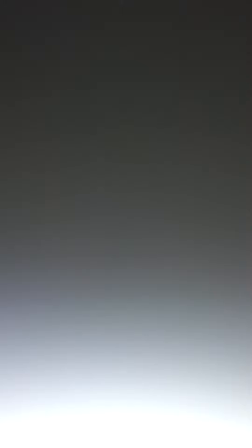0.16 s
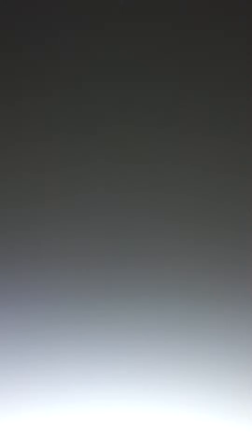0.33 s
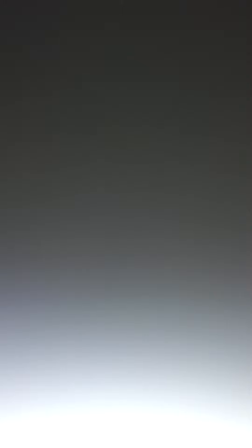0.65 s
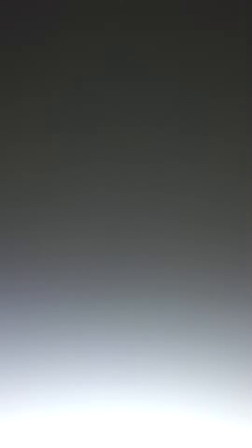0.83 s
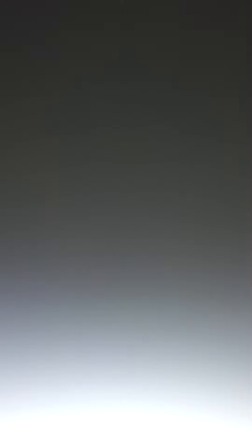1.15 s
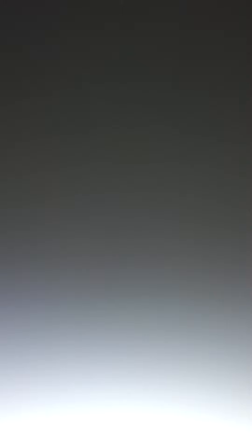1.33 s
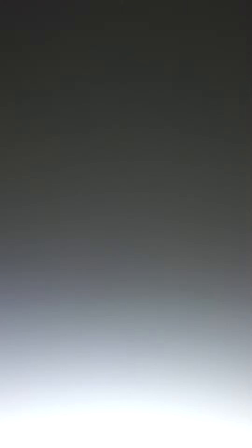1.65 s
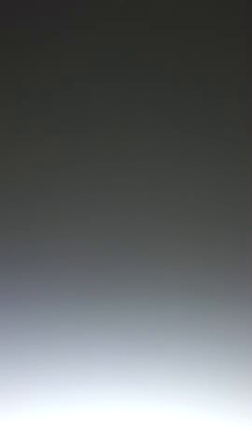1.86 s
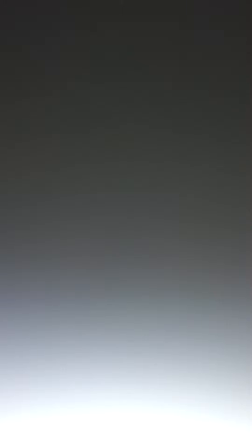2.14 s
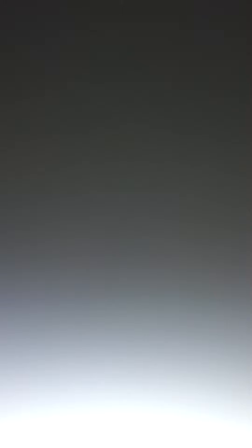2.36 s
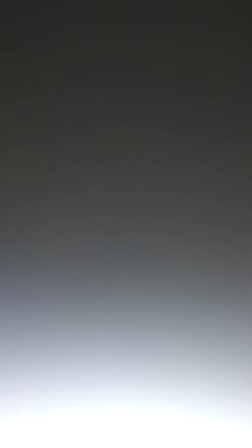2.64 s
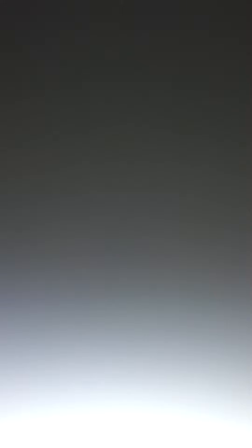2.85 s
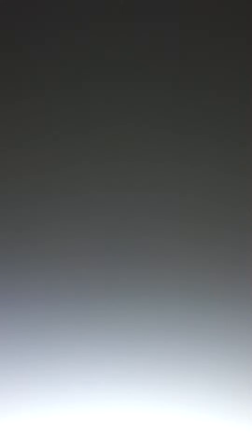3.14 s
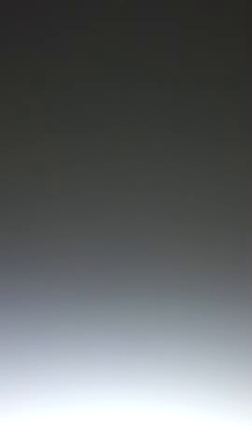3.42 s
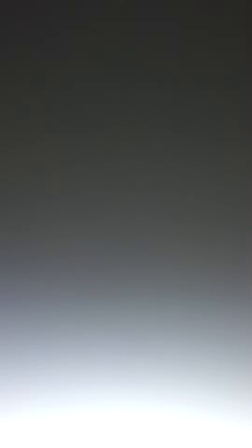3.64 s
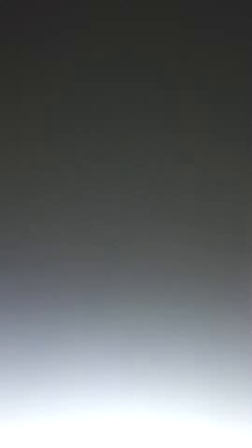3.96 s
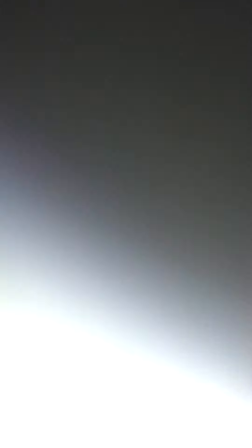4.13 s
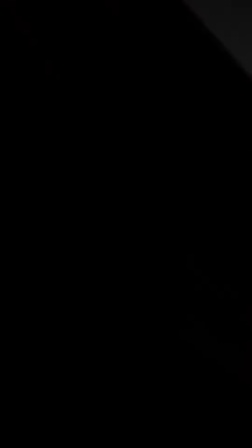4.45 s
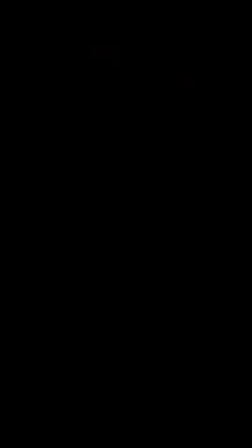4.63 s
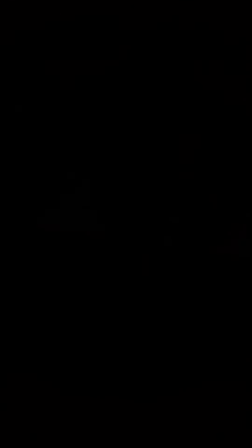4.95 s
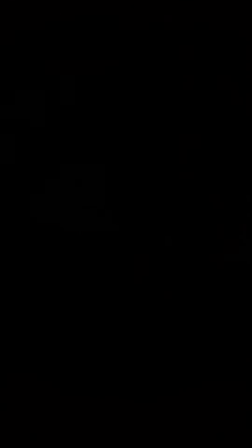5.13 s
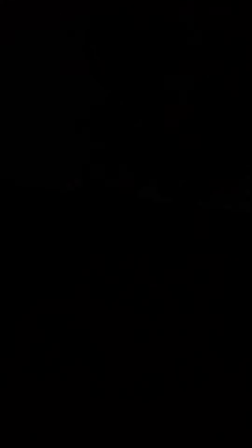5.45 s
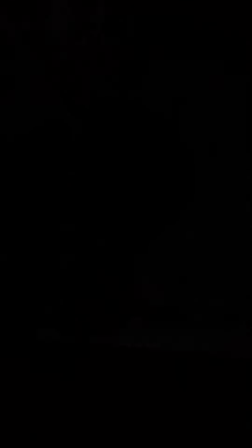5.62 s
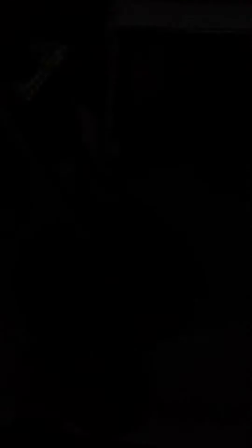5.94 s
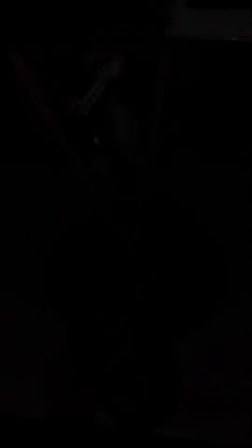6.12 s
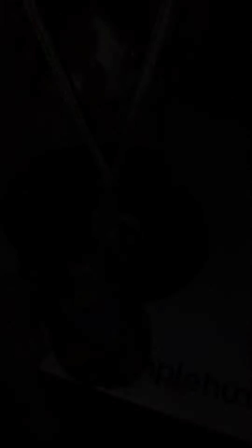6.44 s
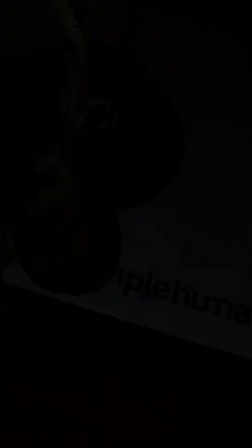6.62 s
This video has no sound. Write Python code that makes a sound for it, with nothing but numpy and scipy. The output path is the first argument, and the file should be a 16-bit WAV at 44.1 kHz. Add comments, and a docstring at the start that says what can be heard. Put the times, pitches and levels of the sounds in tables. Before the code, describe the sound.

Soft, scattered rustles and a hollow scrape come from a cat moving in a cardboard box, heard up close indoors. Suddenly the box knocks loudly and claws drag along its walls, one shove giving the microphone a low bump. The pawing goes on in short scratchy strokes with clicks and slight squeaks of rubbed card, then settles. Quiet room noise and a faint electrical hum run throughout.

```python
"""A quiet room, a small microphone close to a cardboard box in which a cat shifts and paws.
Room noise and a mains hum lie underneath. Fur and pads rustle on the card in tiny stick-slip clicks,
farther scrapes ring the air in the box, and rubbed card squeaks. Knocks ring the walls, dragging claws
make them drone, and one shove shakes the microphone itself."""
import sys
import numpy as np
from scipy import signal
from scipy.io import wavfile
from scipy.ndimage import uniform_filter1d

SR = 44100
rng = np.random.default_rng(int(sys.argv[2]) if len(sys.argv) > 2 else 0)


def master(y):
    """Save y as 16-bit WAV."""
    cut = np.clip(np.atleast_2d(y).T, -1, 1)
    pcm = np.round(cut * 32767)  # scale
    wavfile.write(sys.argv[1], SR, pcm.astype(np.int16))


N = 298998


def gain_of(db):
    return 10 ** (np.asarray(db) / 20)


def unit_rms(x):
    return x / np.sqrt(np.mean(x ** 2) + 1e-20)


def spectrum_db(points, hz):
    """A table of freq_hz, gain_db, read along a log frequency axis."""
    freq_hz, gain_db = np.transpose(points)
    return np.interp(np.log(hz + 1), np.log(freq_hz + 1), gain_db)


def column_at(table, t, column):
    rows = np.array(table)
    return np.interp(t, rows[:, 0], rows[:, column])


def add(mix, start_s, sound):
    part = mix[round(start_s * SR):][:len(sound)]
    part += sound[:len(part)]


def drift(span):
    """Random wander of rms 1, smoothed over span samples."""
    return unit_rms(uniform_filter1d(uniform_filter1d(rng.standard_normal(N), span), span))


def stroke_levels_db(strokes, t):
    """Level of each stroke: a grip, a straight swell or sag, a lift."""
    start, length, first_db, last_db, edge_db_per_s = np.transpose(strokes)[:5, :, None]
    held_db = first_db + (last_db - first_db) * np.clip((t - start) / length, 0, 1)
    outside_s = np.maximum(np.maximum(start - t, t - start - length), 0)
    return held_db - abs(edge_db_per_s) * outside_s


def stroke_envelope(strokes):
    """Gain of the loudest stroke at every sample."""
    t = np.arange(0, N, 32) / SR
    return gain_of(np.interp(np.arange(N) / SR, t, stroke_levels_db(strokes, t).max(0)))


def stroke_blend(strokes, t, rest, rest_db):
    """The strokes' last column and a resting value, averaged by their power."""
    power = gain_of(2 * stroke_levels_db(strokes, t.ravel()))
    rest_power = gain_of(2 * rest_db)
    return (np.transpose(strokes)[-1] @ power + rest * rest_power) / (power.sum(0) + rest_power)


def slips(per_s, spread_db, hiss):
    """Tiny stick-slip clicks of uneven size over a smooth hiss."""
    sizes = gain_of(spread_db * np.minimum(rng.exponential(1, N), 4))
    slipping = rng.random(N) < per_s / SR
    clicks = unit_rms(sizes * slipping * rng.standard_normal(N))
    return unit_rms(clicks + hiss * rng.standard_normal(N))


def colour(x, shape_db, frame):
    """Filters x by shape_db(hz, t), scaled to unit power in each frame."""
    framing = dict(nperseg=frame, noverlap=frame * 3 // 4)
    hz, t, spectra = signal.stft(x, SR, **framing)
    gain = gain_of(shape_db(hz[:, None], t[None]))
    gain /= np.sqrt(np.mean(gain ** 2, 0))
    return signal.istft(spectra * gain, SR, **framing)[1][:N]


def resonate(x, hz, width_hz):
    """Two passes through one resonance, each width_hz wide."""
    b, a = signal.iirpeak(hz, hz / width_hz, SR)
    return signal.lfilter(b, a, signal.lfilter(b, a, x))


def ring(modes, t, t60_scale=1):
    """A sum of decaying sines."""
    return sum(gain_of(db - 60 * t / (t60 * t60_scale)) * np.sin(2 * np.pi * hz * t)
               for hz, db, t60 in modes)


def highpass(x, hz, order):
    return signal.sosfilt(signal.butter(order, hz, "high", fs=SR, output="sos"), x)


# Room tone around the box: freq_hz, relative_db
ROOM_SPECTRUM = [(15, -71), (25, -45), (58, -2), (123, -4), (145, -4.5), (229, -5.5), (354, -5),
                 (591, -7.5), (714, -10), (962, -11), (1040, -13), (1610, -12.5), (4370, -21.5),
                 (7110, -23), (16000, -36.5)]
# Swells in its low end: time_s, gain_db
ROOM_SWELLS = [(0, 1), (1.9, -0.5), (2.3, 4), (2.8, 0.3), (3.45, 4.5), (3.7, -0.3), (5.1, 2), (6.78, 0.7)]


def room_tone(level_db=-53.5):
    """Steady noise all round the microphone; its low end swells gently."""
    framing = dict(nperseg=2048, noverlap=1536)
    hz, t, spectra = signal.stft(rng.standard_normal(N), SR, **framing)
    shape = unit_rms(gain_of(spectrum_db(ROOM_SPECTRUM, hz)))[:, None]
    low_share = 1 / (1 + (hz[:, None] / 900) ** 2)
    swell = gain_of(column_at(ROOM_SWELLS, t, column=1) * low_share)
    return gain_of(level_db) * signal.istft(spectra * shape * swell, SR, **framing)[1][:N]


def mains_hum(pitch_hz=121, level_db=-59):
    """One faint background tone, wavering in pitch and level."""
    cycles = np.cumsum(pitch_hz + 1.06 * drift(4900)) / SR
    waver_db = 1.4 * drift(2000)
    return np.sqrt(2) * gain_of(level_db + waver_db) * np.sin(2 * np.pi * cycles)


# Fur and pads on card, close to the microphone:
# start_s, length_s, first_db, last_db, edge_db_per_s, pressure_0_to_1
FUR_STROKES = [(.535, 0.25, -47, -51, 300, 0.08), (.8, 0.13, -50.5, -57, 400, 0.25),
               (1.0, 0.32, -60, -44, 400, 0.28), (1.25, 0.1, -43, -37, 400, .34),
               (1.39, .2, -53, -48.5, 250, 0.18), (1.7, 0.021, -50.5, -57, 200, 0.24),
               (2.02, 0.23, -58, -57, 300, 0), (2.22, 0.037, -57, -45.5, 550, .4),
               (2.33, .17, -50, -44, 600, 0.26), (2.7, 0.13, -54.5, -55, 150, 0),
               (3.03, 0.23, -55, -53, 300, 0.07), (3.32, .24, -53.5, -57.5, 300, 0),
               (3.81, 0.041, -49.5, -47.5, 307, 1), (3.87, 0.035, -41, -36, 600, 0.12),
               (3.945, .022, -49, -42, 500, 0.2), (3.973, 0.044, -31.5, -26, 4000, 0.95),
               (4.023, 0.12, -23, -32.5, 2500, 0.37), (4.15, .054, -39.5, -38, 1200, 0.05),
               (4.27, 0.059, -46.5, -33.5, 300, .2), (4.33, 0.051, -32.5, -35.5, 300, 0.42),
               (4.39, 0.03, -31.5, -30, 300, 0.56), (4.485, 0.016, -33, -35, 280, 0.45),
               (4.605, .015, -40, -48, 250, .02), (4.668, 0.1, -27.5, -32, 600, 0.45),
               (4.8, 0.12, -43.5, -38.5, 400, .2), (4.92, 0.054, -31.5, -42, 389, .35),
               (4.965, 0.041, -42, -39, 500, 0.44), (5.012, 0.076, -35, -50, 500, 0.4),
               (5.08, 0.31, -51.5, -57.5, 400, 0.45), (5.36, .014, -40.5, -39, 998, 0.16),
               (5.385, .03, -43, -48, 500, 0.7), (5.434, .015, -35, -45, 900, 0.45),
               (5.45, 0.12, -42, -38, 300, 0.31), (5.614, 0.083, -42.5, -58, 400, 0.07),
               (5.767, 0.0051, -44.5, -51, 1500, 0.6), (5.84, 0.039, -49.5, -46.5, 600, .6),
               (5.885, 0.2, -47, -68, 400, 1), (6.51, 0.28, -51.5, -48, 150, 0.26)]
# Colour of a light stroke: freq_hz, relative_db
LIGHT_SPECTRUM = [(410, -47), (700, -5), (757, -3), (1310, -6), (1520, -14.5), (3030, -10), (3640, -12.5),
                  (4320, -9.5), (5920, -4.5), (8100, -10.5), (10300, -28.5), (16000, -32.5)]
# What full pressure adds to that colour: freq_hz, relative_db
PRESSURE_SPECTRUM = [(1000, -32.5), (2000, -8), (2700, -2), (3300, -1.5), (4000, 4.5), (8000, 5),
                     (14000, -1)]


def fur_rustle(rest_db=-62.5, rest_pressure=0.22, rest_wander_db=4.5):
    """Dense slips of hair on card; patches of the surface brighten and dull as the paw moves."""
    patches = rng.standard_normal((129, N // 64 + 9))  # frequency bins by frames
    patches = unit_rms(uniform_filter1d(uniform_filter1d(patches, 5, axis=0), 30, axis=1))

    def shape_db(hz, t):
        pressure = stroke_blend(FUR_STROKES, t, rest_pressure, rest_db)
        pressed_db = pressure * spectrum_db(PRESSURE_SPECTRUM, hz)
        return spectrum_db(LIGHT_SPECTRUM, hz) + pressed_db + 1.8 * patches[:, :t.size]

    flutter = gain_of(0.65 * drift(170))
    brushing = gain_of(rest_db + rest_wander_db * drift(3600))  # faint fur between strokes
    level = np.hypot(stroke_envelope(FUR_STROKES), brushing)
    friction = slips(per_s=9000, spread_db=1.2, hiss=0.85)
    return level * flutter * colour(friction, shape_db, frame=256)


# Scrapes farther from the microphone: start_s, length_s, first_db, last_db, edge_db_per_s
FAR_SCRAPES = [(.51, .2, -41, -45.5, 450), (.89, 0.018, -50, -51.5, 400), (.968, 0.0071, -50, -49.5, 700)]
# Resonances of the air in the box: pitch_hz, width_hz, relative_db
AIR_MODES = [(352, 110, -2.5), (473, 52, -3.5), (720, 210, 5), (812, 17, 1.5), (996, 34, -3),
             (1325, 52, -4), (1480, 450, 4), (1720, 70, -10)]


def hollow_scrapes():
    """Uneven slips ring the air inside the box."""
    friction = slips(per_s=3000, spread_db=1.9, hiss=0.86) * gain_of(2.3 * drift(190))
    air = sum(gain_of(db) * unit_rms(resonate(friction, hz, width_hz)) for hz, width_hz, db in AIR_MODES)
    return stroke_envelope(FAR_SCRAPES) * unit_rms(air)


# Bands that sing as the card is rubbed: start_s, length_s, pitch_hz, width_hz, level_db
CARD_SQUEAKS = [(0.874, 0.11, 860, 40, -54), (0.879, 0.042, 1190, 40, -51.5),
                (1.231, 0.054, 5060, 700, -44.5), (1.232, 0.066, 3170, 500, -49.5),
                (2.427, 0.087, 5060, 500, -53), (3.856, 0.018, 1250, 120, -52),
                (4.162, 0.049, 6460, 900, -37.5), (4.695, 0.098, 1146, 110, -46.5),
                (5.484, 0.1, 5700, 900, -39.5), (5.608, 0.038, 1060, 80, -52)]


def card_squeaks():
    """Rubbed card sings: noise in one narrow resonance, swelling and fading."""
    out = np.zeros(N)
    for start_s, length_s, hz, width_hz, db in CARD_SQUEAKS:
        settled = resonate(rng.standard_normal(12000), hz, width_hz)[4000:]
        tone = unit_rms(settled[:round(length_s * SR)])
        add(out, start_s, gain_of(db) * tone * signal.windows.tukey(len(tone), 0.4))
    return out


# Blows and claw ticks, close up: start_s, thump_db, click_db, panel_db, click_tilt_db_per_octave
BLOWS = [(2.264, -45.5, -56, -65, 1.3), (3.8838, -39, -9.5, -41, -1), (3.8854, -13, -2, -15.5, -11),
         (3.8917, -12.5, -12.5, -18, -1), (3.9719, -27.5, -34, -60, -7), (4.0983, -17, -30, -24.5, -3),
         (4.118, -37, -27, -33, 2.1), (4.201, -57, -51, -79, 5), (4.44, -41, -60, -68, .1),
         (4.6734, -26, -12.5, -67, -7), (4.9345, -55, -29.5, -80, -18), (4.9662, -19.5, -57, -37, 7),
         (5.0125, -39, -32, -67, -11), (5.357, -45, -38, -69, .1), (5.43, -57, -33, -85, 10),
         (5.501, -63, -35, -88, 5), (5.628, -60, -31, -86, -6), (5.708, -44, -63, -74, -3),
         (5.738, -43, -62, -64, -3), (5.767, -62, -44, -81, -11)]
# Thump of the box: pitch_hz, gain_db, base_t60_s
BOX_MODES = [(297, -13, 0.017), (350, 2.5, 0.019), (411, -13, 0.095), (537, -1, 0.043), (680, -13, 0.057),
             (840, -11.5, 0.038), (1030, -2.5, 0.051), (1366, -18, 0.052), (1690, -30, 0.028),
             (2300, -13, 0.031)]
# Boom of its large wall panels: pitch_hz, gain_db, base_t60_s
PANEL_MODES = [(159, -1.5, 0.077), (200, 3.5, 0.056), (270, -11.5, 0.045)]
# Its stiff folded edges: pitch_hz, gain_db, t60_s
FOLD_MODES = [(2200, -13.5, 0.009), (3270, -10.5, 0.013), (14800, -24, .008)]
# Colour of a crack: freq_hz, relative_db
CRACK_SPECTRUM = [(1500, -34), (2500, -6.5), (3300, -5.5), (4200, -6), (6000, 1.5), (8000, 1.5),
                  (10000, -7.5), (12500, -18), (15000, -31)]


def box_knocks(tap_t60_scale=0.47, slam_db=-16, crack_t60_s=0.0075, scatter_t60_s=0.052):
    """Each blow pushes the walls in, so they ring, and leaves a short crack."""
    box, panels, cracks = np.zeros((3, N))
    t = np.arange(6000) / SR
    crack_decay = gain_of(-60 * t / crack_t60_s) + gain_of(-30 - 60 * t / scatter_t60_s)
    for start_s, thump_db, click_db, panel_db, tilt in BLOWS:
        slam = gain_of(3.1 * min(panel_db - slam_db, 1))  # hard blows ring longer
        fold_db = click_db - 3.5 * max(tilt, 0)  # thin, bright ticks barely move the folds
        add(box, start_s, -gain_of(thump_db) * ring(BOX_MODES, t, tap_t60_scale + 0.86 * slam))
        add(box, start_s, gain_of(fold_db) * ring(FOLD_MODES, t))
        add(panels, start_s, -gain_of(panel_db) * ring(PANEL_MODES, t, tap_t60_scale + 0.83 * slam))
        add(cracks, start_s, gain_of(click_db) * rng.standard_normal(t.size) * crack_decay)

    def shape_db(hz, t):
        octaves = np.log2(np.clip(hz, 500, 9000) / 4500)
        return spectrum_db(CRACK_SPECTRUM, hz) + column_at(BLOWS, t, column=4) * octaves

    cracks = colour(cracks, shape_db, frame=128)
    # A wall radiates little below its lowest ring, and a crack has no bass.
    return highpass(box, 210, order=4) + highpass(panels, 90, order=3) + highpass(cracks, 700, order=2)


# Claws along the walls, close up:
# start_s, length_s, first_db, last_db, edge_db_per_s, tilt_db_per_octave
CLAW_DRAGS = [(2.335, 0.08, -55, -52, 400, 3), (2.494, 0.0041, -38.5, -40.5, 701.5, -.5),
              (3.995, 0.095, -36.5, -28.5, 503, -2.5), (4.097, 0.051, -22.5, -33, 2000, -.5),
              (4.168, 0.03, -40.5, -39.5, 1400, 1), (4.69, 0.099, -47.5, -50, 400, 3.5),
              (5.014, 0.0054, -40, -52, 1200, -1), (5.4, 0.16, -52.5, -63, 300, -2.5),
              (5.612, 0.03, -46, -60, 350, 3.5)]
# What the walls radiate to the microphone: freq_hz, relative_db
WALL_SPECTRUM = [(35, -44), (60, -15), (251, 0), (340, 1), (478, -0.5), (695, 1), (783, -11), (838, -2.5),
                 (1830, -4.5), (3500, -18), (4550, -58), (7700, -120)]


def claw_drags():
    """Slipping claws shake the walls into a drone, each drag with its own brightness."""
    def shape_db(hz, t):
        tilt = stroke_blend(CLAW_DRAGS, t, rest=0, rest_db=-120)
        return spectrum_db(WALL_SPECTRUM, hz) + tilt * np.log2((hz + 50) / 600)

    judder = gain_of(1.5 * drift(200))
    friction = slips(per_s=3000, spread_db=0.77, hiss=5.3)
    return stroke_envelope(CLAW_DRAGS) * judder * colour(friction, shape_db, frame=512)


def microphone_jolt(start_s=4.095, pitch_hz=60.6, gain_db=-30, t60_s=0.23, rise_s=0.02):
    """One shove shakes the microphone: a low swing that grows quickly and dies."""
    out, t = np.zeros(N), np.arange(12000) / SR
    rise = 1 - np.exp(-(t / rise_s) ** 2)
    add(out, start_s, rise * ring([(pitch_hz, gain_db, t60_s)], t))
    return out


def scene():
    """The cat in its box and the room, in mono from beside the card."""
    cat = fur_rustle() + claw_drags() + hollow_scrapes() + card_squeaks() + box_knocks()
    return (cat + microphone_jolt() + room_tone() + mains_hum())[None]


def record(dry, ceiling=0.84, top_hz=15850):
    """The microphone drops the deepest bass, its amplifier rounds the peaks, and the top is cut off."""
    thinned = highpass(dry, 45, order=2)
    rounded = ceiling * np.tanh(thinned / ceiling)
    lowpass = signal.firwin(511, top_hz, window=("kaiser", 9), fs=SR)
    return signal.oaconvolve(rounded, lowpass[None], "same")


dry = scene()
out = record(dry)
master(out)
```